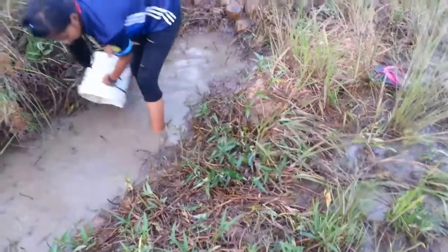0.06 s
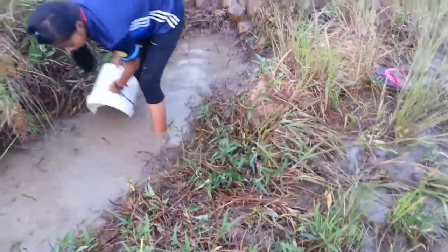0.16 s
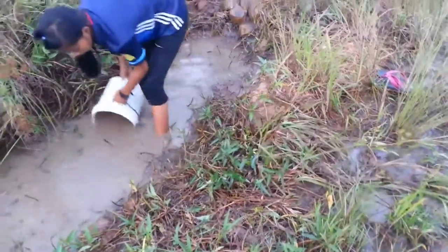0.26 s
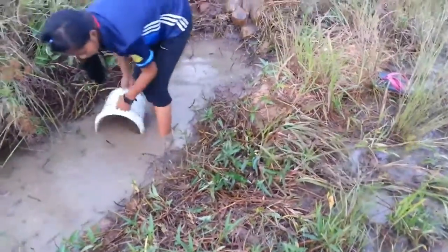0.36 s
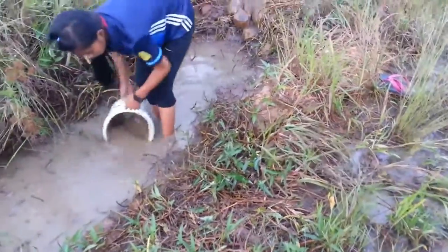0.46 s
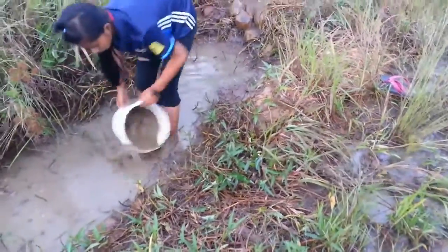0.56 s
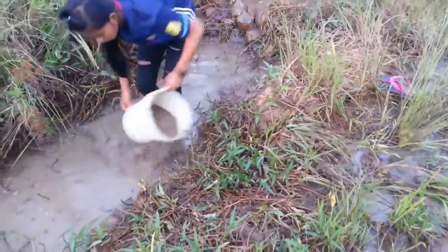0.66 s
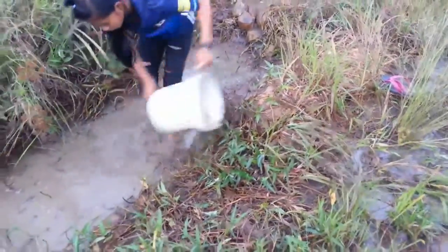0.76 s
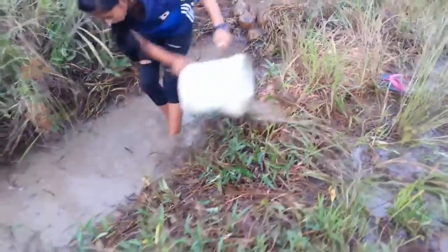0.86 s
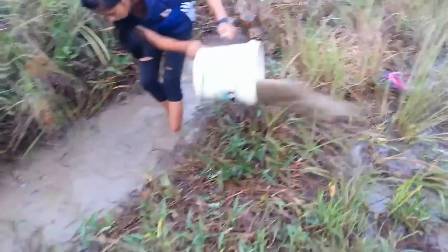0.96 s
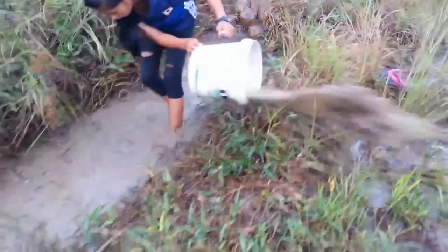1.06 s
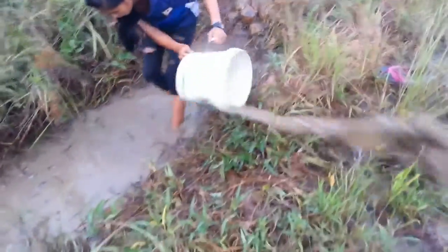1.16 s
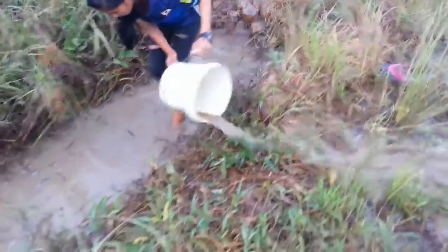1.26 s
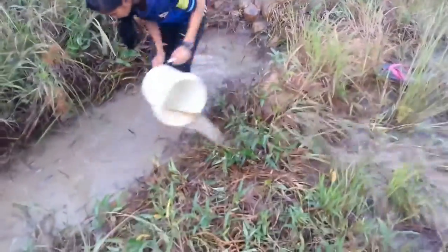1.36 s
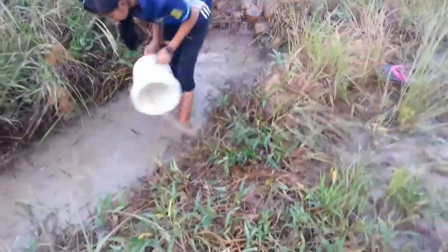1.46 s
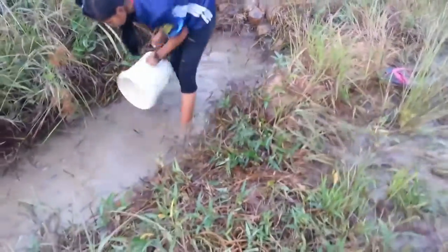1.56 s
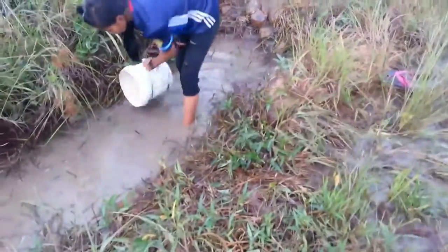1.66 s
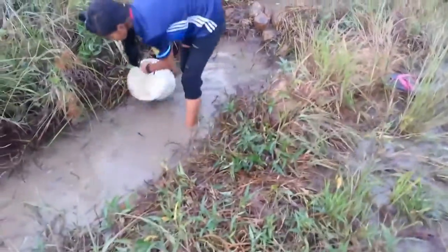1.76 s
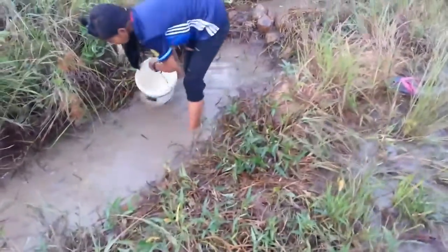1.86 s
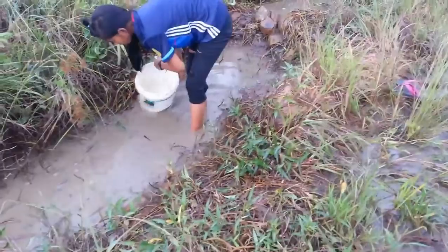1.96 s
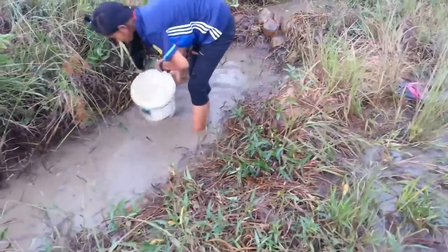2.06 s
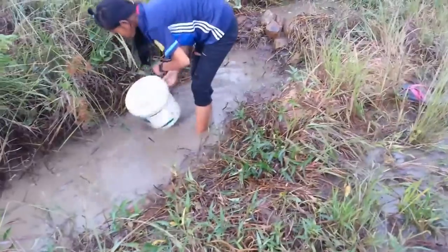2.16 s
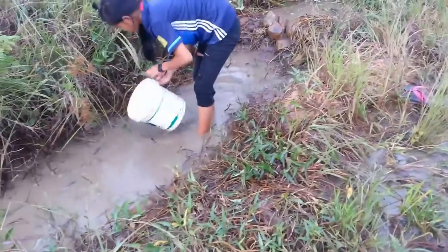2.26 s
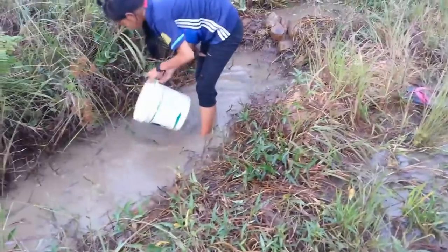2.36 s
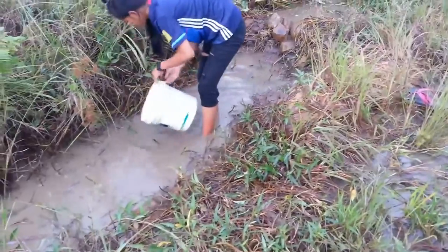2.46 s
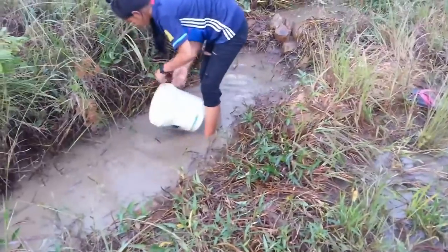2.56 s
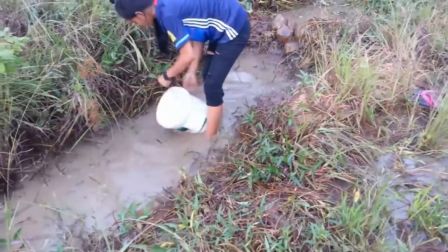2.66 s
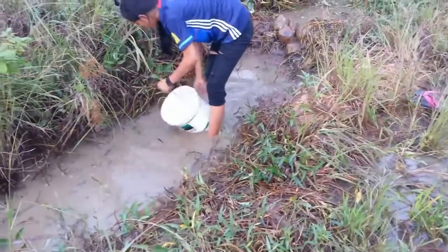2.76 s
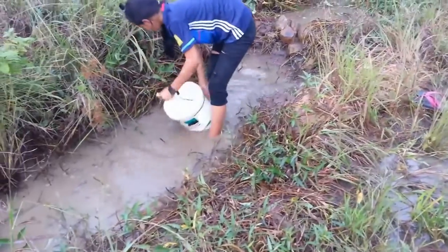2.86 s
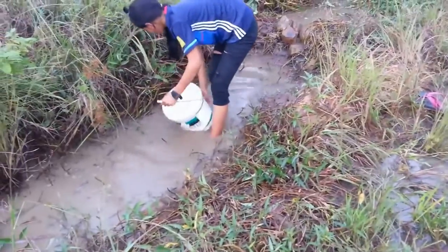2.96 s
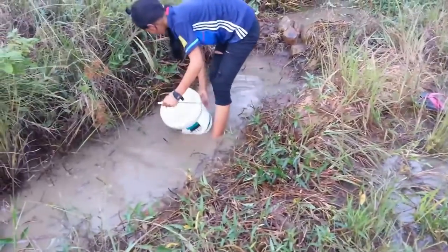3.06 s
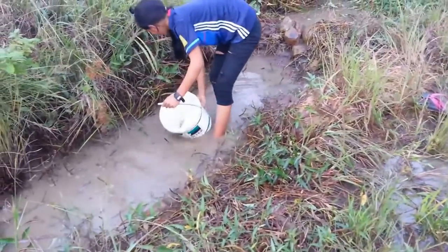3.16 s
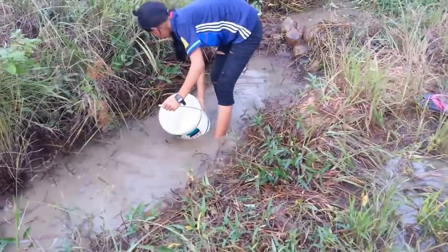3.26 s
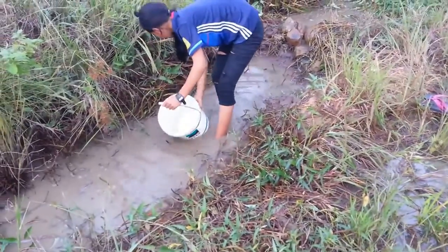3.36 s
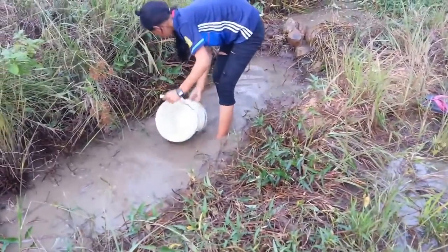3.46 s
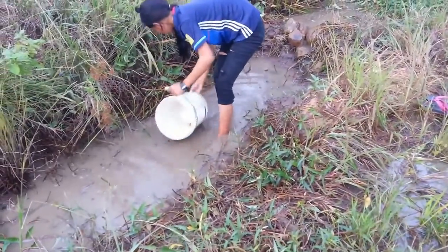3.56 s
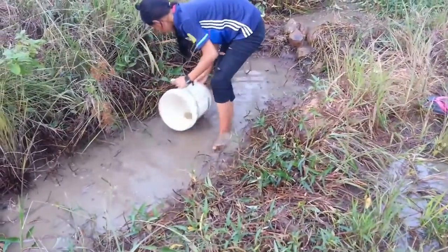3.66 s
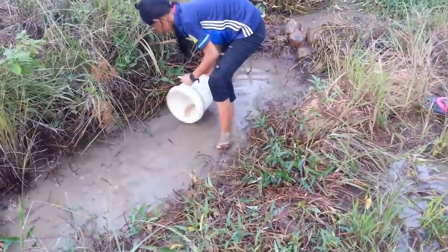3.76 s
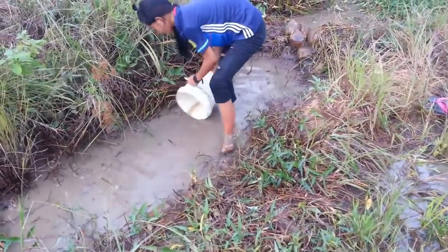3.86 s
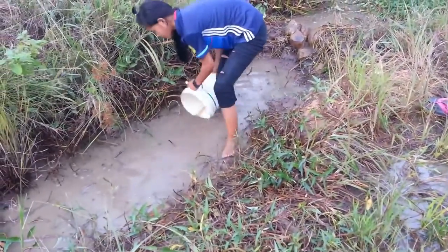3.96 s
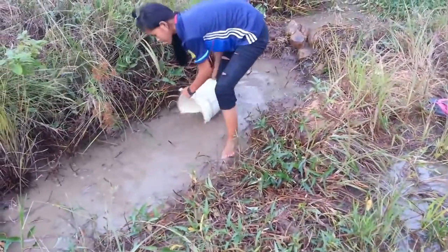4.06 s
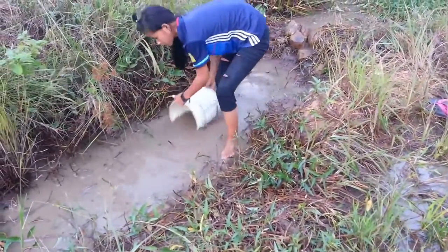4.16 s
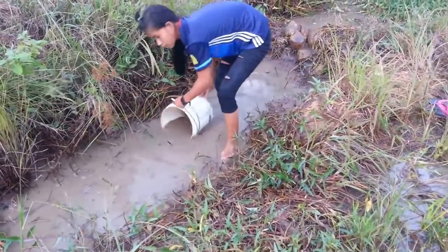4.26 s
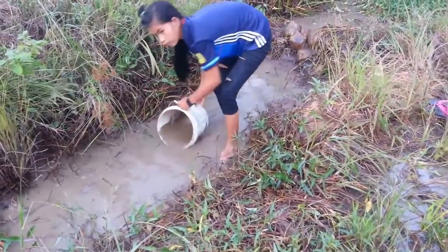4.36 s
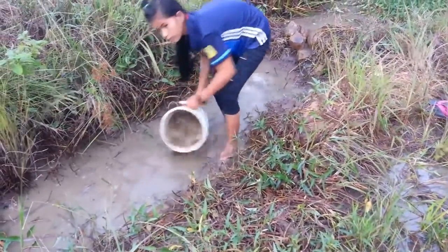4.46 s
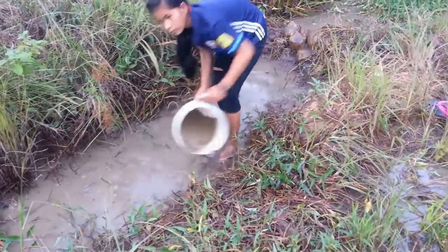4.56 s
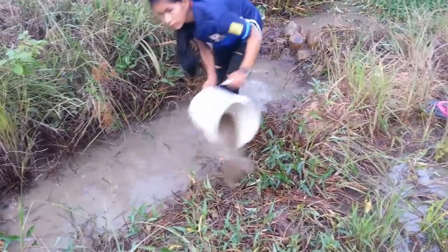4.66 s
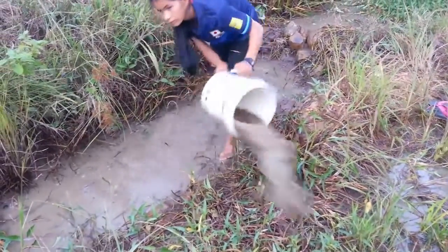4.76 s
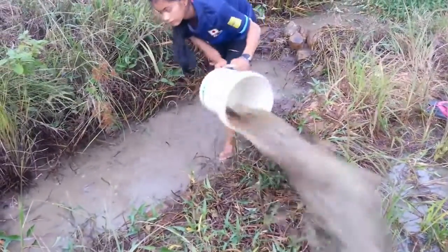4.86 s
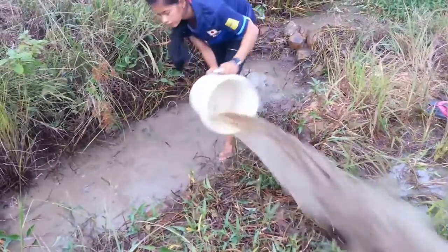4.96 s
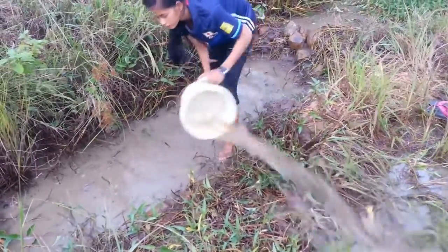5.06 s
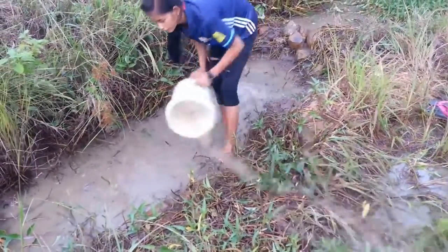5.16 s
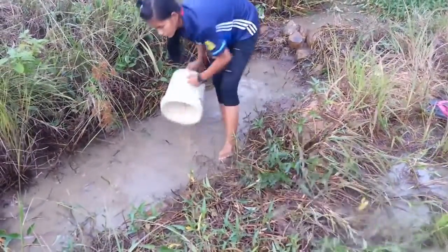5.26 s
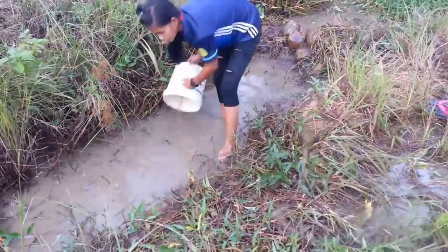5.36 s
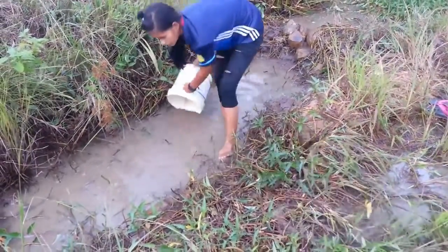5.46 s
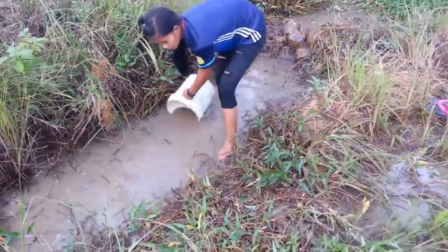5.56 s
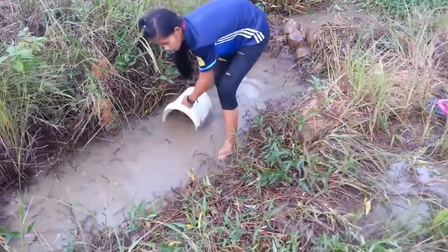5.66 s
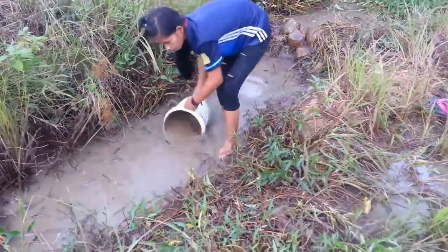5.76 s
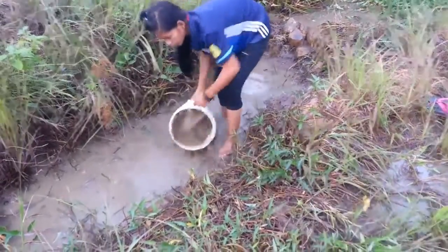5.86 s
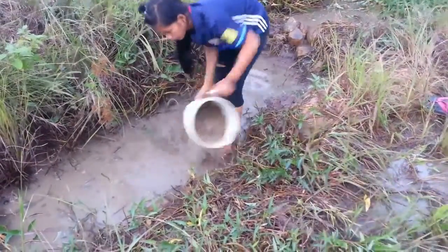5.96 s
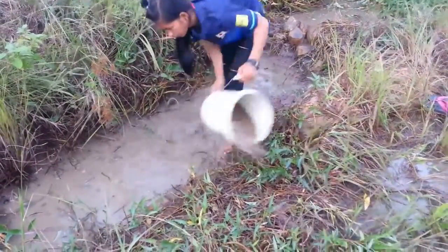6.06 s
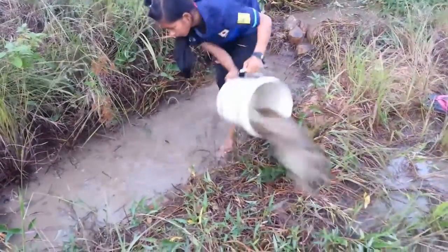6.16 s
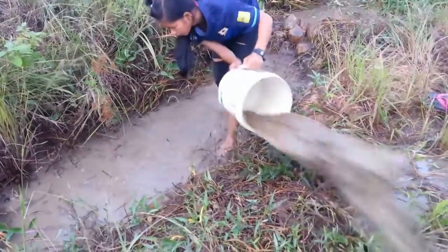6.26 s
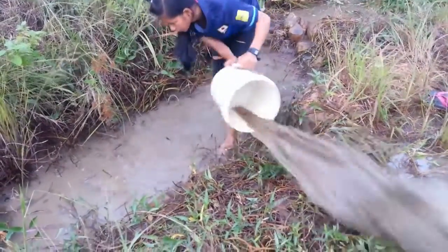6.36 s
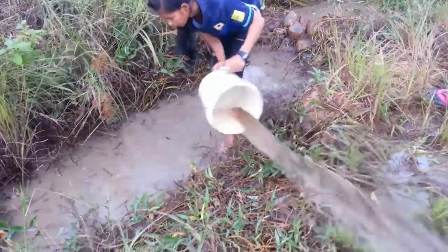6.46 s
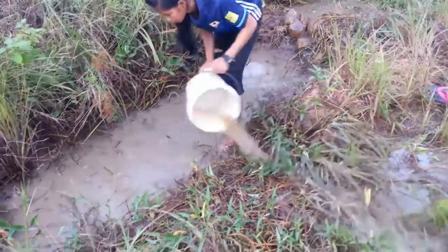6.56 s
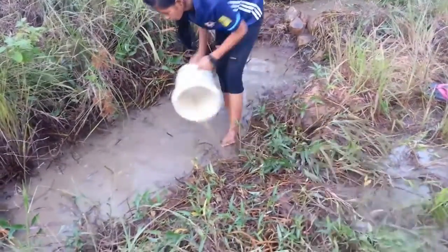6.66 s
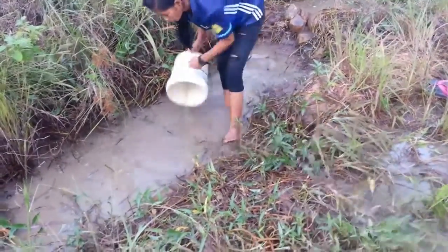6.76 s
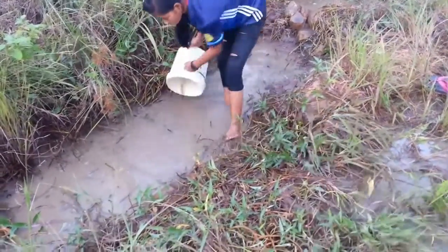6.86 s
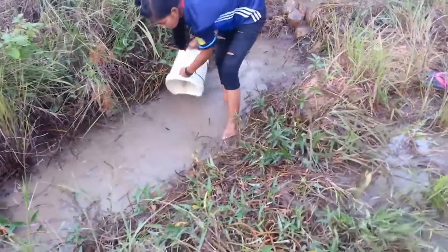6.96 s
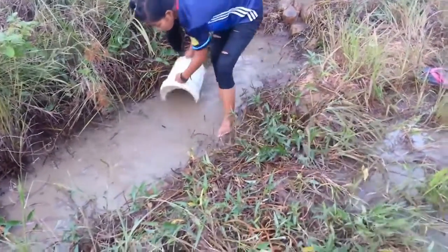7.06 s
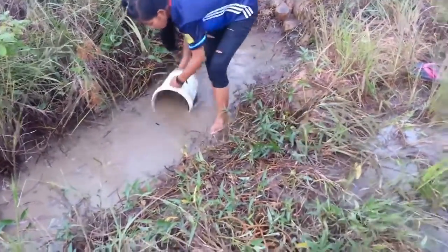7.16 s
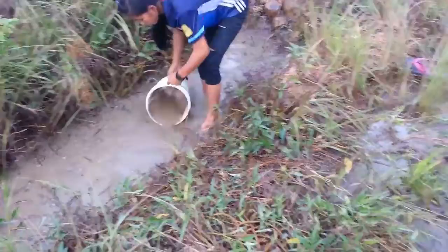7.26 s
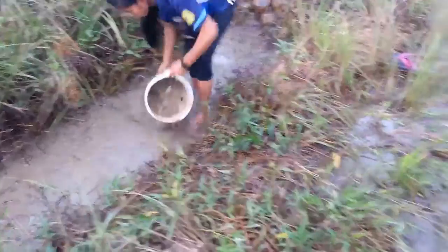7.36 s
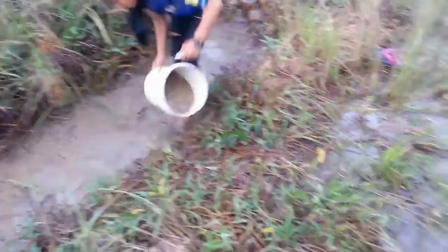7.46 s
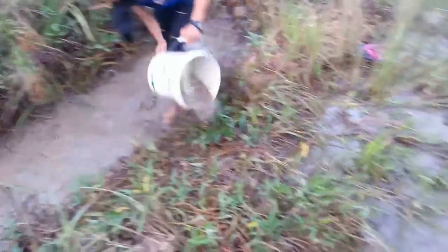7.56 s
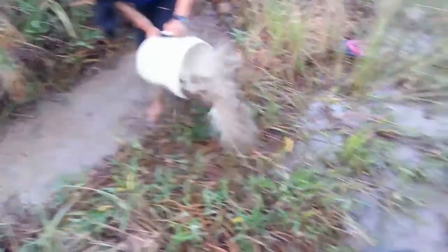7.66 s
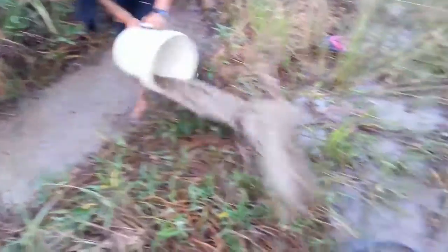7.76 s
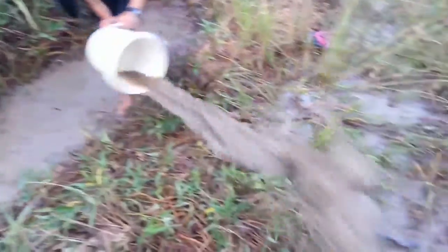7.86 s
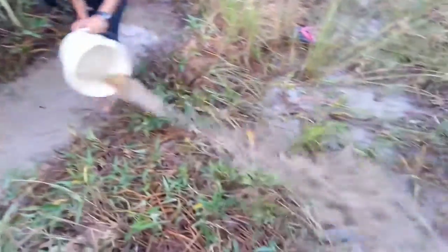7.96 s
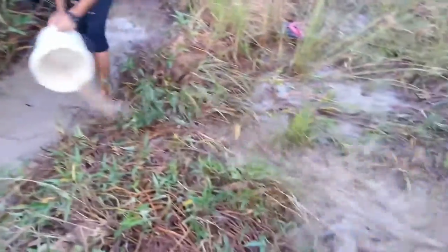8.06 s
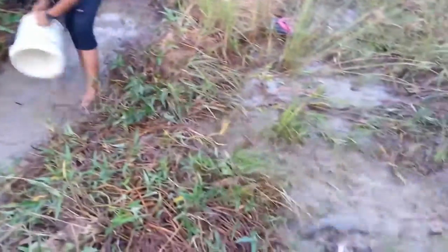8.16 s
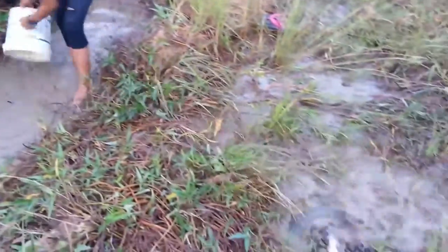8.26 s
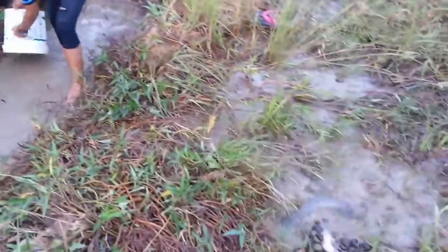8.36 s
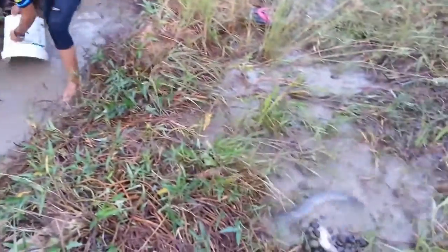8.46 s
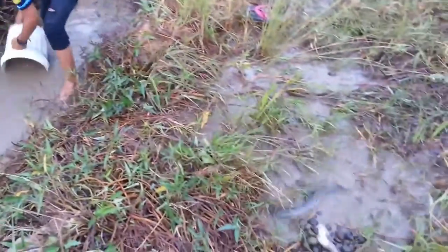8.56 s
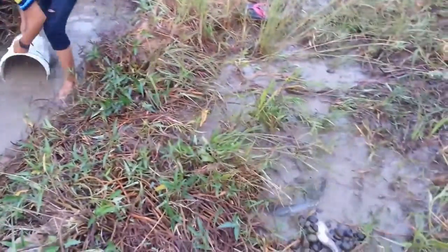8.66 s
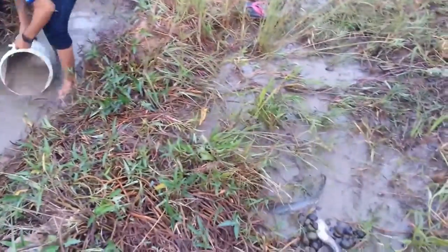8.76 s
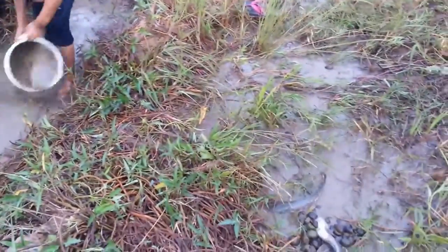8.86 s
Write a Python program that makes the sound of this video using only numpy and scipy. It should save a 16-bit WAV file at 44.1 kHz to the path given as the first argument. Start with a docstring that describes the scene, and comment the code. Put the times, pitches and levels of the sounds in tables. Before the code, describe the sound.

Close outdoor view of a plastic bucket bailing a muddy ditch. It gulps and sloshes, throws a load that splatters on the grassy bank, then booms hollowly when empty. Quieter dabbling and small slaps follow, then three more scoops and splashing throws. A far one-cylinder engine thuds steadily and a small bird repeats a high trill. Stereo, with the left side noticeably brighter.

```python
"""A plastic bucket bails a muddy ditch: it dips, gulps and sloshes, then flings a first load onto a grassy bank.
Straight after that, the emptied bucket booms like a drum; more bailing follows, then three loads in turn.
Throughout, a far one-cylinder engine thuds and a small bird repeats its trill.
Water is summed from droplets, bubbles and filtered noise; the bucket rings as decaying sines.
The left microphone is much stronger than the right in the presence range."""
import sys
import numpy as np
from scipy import signal
from scipy.fft import rfft, irfft, next_fast_len
from scipy.io import wavfile
from scipy.ndimage import map_coordinates

SR = 44100
rng = np.random.default_rng(int(sys.argv[2]) if len(sys.argv) > 2 else 0)


def pcm_store(signal):
    """Save signal as 16-bit PCM."""
    levels = np.round(np.clip(np.atleast_2d(signal), -1, 1) * 32767)
    wavfile.write(sys.argv[1], SR, levels.astype(np.int16).T)


N = 393372


def amp(db):
    """Decibels to gain."""
    return 10 ** (np.asarray(db) / 20)


def unit(x):
    """Scale to rms 1."""
    return x / np.sqrt(np.mean(x ** 2) + 1e-20)


def along(points, hz):
    """Interpolate (f/Hz, value) points on a log frequency axis."""
    point_hz, values = np.transpose(points)
    return np.interp(np.log(hz + 1), np.log(point_hz), values)


def wobble(knots_per_s):
    """Smooth random curve through normally distributed knots."""
    knots = rng.standard_normal(int(N * knots_per_s / SR) + 4)
    return map_coordinates(knots, [np.arange(N) * knots_per_s / SR], order=2)


def coloured(x, spectrum):
    """Minimum-phase filter with the gain of (f/Hz, level/dB) points, by folding the cepstrum."""
    n = x.shape[-1]
    m = 2 * next_fast_len(n // 2 + 2048)
    gain = amp(along(spectrum, np.fft.rfftfreq(m, 1 / SR)))
    cepstrum = irfft(np.log(gain))
    cepstrum[1:m // 2] *= 2
    cepstrum[m // 2 + 1:] = 0
    response = np.exp(rfft(cepstrum))
    return irfft(rfft(x, m) * response, m)[..., :n]


def add(track, start_s, sound):
    """Mix a sound into a track at start_s."""
    part = track[..., max(0, round(start_s * SR)):][..., :sound.shape[-1]]
    part += sound[..., :part.shape[-1]]


def swell(peak_s, rise_s, hold_s, fade_s):
    """Gain straight in dB: up to 1 at peak_s, hold, fade; rise_s and fade_s each span 20 dB."""
    t = np.arange(N) / SR - peak_s
    rise = np.maximum(-t, 0) / rise_s
    fade = np.maximum(t - hold_s, 0) / fade_s
    return amp(-20 * (rise + fade))


def spread(starts, shapes, lead_ms, scatter_ms):
    """Sum grains in stereo; each has its own left-channel lead (negative: right leads), as from its direction."""
    lag = np.round(rng.normal(lead_ms, abs(scatter_ms), len(starts)) * SR / 1000).astype(int)
    places = starts[:, None] + np.arange(shapes.shape[1])
    return np.array([np.bincount(np.abs(places + d).ravel(), shapes.ravel(), N)[:N]
                     for d in (0, lag[:, None])])


def droplets(per_s, size_db, lead_ms, scatter_ms):
    """Tiny impacts: single-sample clicks of very unequal size and random sign."""
    count = int(per_s * N / SR)
    sizes = amp(size_db * np.minimum(rng.exponential(size=count), 4))
    sizes = sizes * rng.choice([-1, 1], count)
    return unit(spread(rng.integers(0, N, count), sizes[:, None], lead_ms, scatter_ms))


def bubble(t, start_hz, t60_s, rise):
    """An air pocket rings, its pitch climbing as it nears the surface."""
    ring = np.sin(2 * np.pi * start_hz * t * (1 + rise * t / t60_s))
    return ring * amp(-60 * t / t60_s) * (1 - np.exp(-2 * start_hz * t))


def froth(per_s, hz, octaves, cycles, size_db, lead_ms):
    """A cloud of bubbles of random size, pitch and life."""
    count, t = int(per_s * N / SR), np.arange(SR // 70) / SR
    octave, linger = rng.standard_normal((count, 2)).T[:, :, None]
    pitch_hz = np.clip(hz * 2 ** (octaves * octave), 400, 12000)
    life_s = np.minimum(cycles / pitch_hz * 2 ** (linger / 2), 2 * t[-1])
    sizes = amp(size_db * np.minimum(rng.exponential(size=(count, 1)), 3))
    rings = sizes * bubble(t, pitch_hz, life_s, rise=0.14)
    return unit(spread(rng.integers(0, N, count), rings, lead_ms, scatter_ms=0.19))


# open-air hiss spectrum: f/Hz, relative level/dB
AIR_SPECTRUM = [(25, -20), (55, 12.5), (150, -1), (300, 2.5), (600, -5.5), (1000, -4.5), (2000, -20),
                (4000, -37), (8000, -15.5), (11000, -18), (15000, -30)]


def open_air():
    """Faint stereo hiss: independent noise per channel, filtered."""
    return amp(-56) * unit(coloured(rng.standard_normal((2, N)), AIR_SPECTRUM))


# engine speed and loudness: t/s, firings per second [1/s], relative level/dB
ENGINE_FIRING = [(0, 18.6, -8.5), (.5, 19.9, 0.5), (1.1, 20.5, -2), (2.2, 20.4, -1), (3.6, 20.8, -3),
                 (5.25, 22, 1.5), (5.6, 19, -0.5), (6.4, 19, 1), (7.7, 17.4, 3), (8.4, 16.3, 0),
                 (8.92, 16, 3.5)]
# exhaust thud spectrum: f/Hz, relative level/dB
EXHAUST_SPECTRUM = [(25, -41), (50, -22), (80, -2.5), (120, 8.5), (150, 7.5), (190, -24.5), (330, -19),
                    (500, -49), (1000, -69)]
# engine clatter spectrum: f/Hz, relative level/dB
CLATTER_SPECTRUM = [(40, -17), (90, 3), (170, -4.5), (340, -4), (450, -18.5), (800, -17.5), (2000, -39)]


def engine():
    """One soft exhaust thud per firing, over low noise clatter that throbs with it."""
    point_s, firings_per_s, level_db = np.transpose(ENGINE_FIRING)
    t = np.arange(N) / SR
    cycles = np.cumsum(np.interp(t, point_s, firings_per_s)) / SR
    firings = np.diff(np.floor(cycles), prepend=0) * amp(2.2 * wobble(12))
    thuds = unit(coloured(firings, EXHAUST_SPECTRUM))
    throb = 1 + 0.61 * np.cos(2 * np.pi * cycles)
    clatter = unit(coloured(rng.standard_normal(N) * throb, CLATTER_SPECTRUM))
    return amp(np.interp(t, point_s, level_db)) * (amp(-50) * thuds + amp(-49) * clatter)


# bird songs: first long note t/s, relative level/dB, trill notes before it [count], growth per trill note [dB]
BIRD_SONGS = [(.852, -38.5, 10, .25), (2.454, -37.5, 11, .65), (3.942, -38.5, 15, 1.1),
              (5.368, -41, 11, .7), (6.858, -41, 11, .7), (8.318, -41, 11, .7)]


def bird():
    """A quick soft trill grows and ends in four longer, louder notes; each note slides down."""
    short_gap_s, lead_gap_s, long_gap_s = 0.042, 0.056, 0.0685
    short_top_hz, long_top_hz, end_hz = 7080, 7550, 6200
    short_db = -6.5  # last trill note re long notes
    out = np.zeros(N)
    ending = [(k * long_gap_s, long_gap_s, long_top_hz, 0) for k in range(4)]
    for song_s, song_db, count, growth_db in BIRD_SONGS:
        trill = [(-lead_gap_s - k * short_gap_s, short_gap_s, short_top_hz, short_db - k * growth_db)
                 for k in range(count)]
        for offset_s, gap_s, top_hz, note_db in trill + ending:
            u = np.linspace(0, 1, int((0.0195 + 0.42 * gap_s) * SR))
            hz = (top_hz + (end_hz - top_hz) * u ** 1.1) * rng.normal(1, 0.004)
            note = np.sin(np.pi * u) ** 2 * np.sin(2 * np.pi * np.cumsum(hz) / SR)
            add(out, song_s + offset_s, amp(song_db + note_db + rng.normal(0, 1)) * note)
    return out


def banks(x):
    """The ditch's banks scatter a short, weak echo: convolution with decaying, filtered noise."""
    t = np.arange(SR // 6) / SR
    tail = rng.standard_normal((2, len(t))) * amp(-60 * t / 0.21) * (t > 0.003)
    tail = coloured(tail / np.linalg.norm(tail[0]), [(250, -39), (1000, 2), (5000, -2.5), (14000, 4)])
    return signal.fftconvolve(x, tail, axes=1)[:, :N]


# blows on the empty bucket: t/s, relative level/dB
BOOM_BLOWS = [(1.581, -12), (1.588, -21)]
# bucket modes: f/Hz, relative level/dB, t60/s
BUCKET_MODES = [(160.2, 0.5, 0.18), (305, 1.5, 0.079), (371, -39, .16), (780, -31, .1), (947, -17, 0.18)]


def boom():
    """The bucket's base flexes and rings the air inside: decaying sine modes."""
    out, t = np.zeros(N), np.arange(SR // 2) / SR
    ring = sum(amp(db - 60 * t / t60_s) * np.sin(2 * np.pi * hz * t) for hz, db, t60_s in BUCKET_MODES)
    onset = 1 - np.exp(-t / 0.003)
    for blow_s, blow_db in BOOM_BLOWS:
        add(out, blow_s, -amp(blow_db) * ring * onset)
    return out


# ringing air pockets, plinks to gulps under the rim: t/s, relative level/dB, starting f/Hz
AIR_POCKETS = [(.358, -23.5, 656), (.389, -27.5, 623), (.4, -28, 2070), (.465, -31.5, 316),
               (.562, -31, 314), (.695, -35, 1900), (.723, -30, 1190), (.76, -25.5, 356), (.835, -28, 1970),
               (0.853, -32, 360), (1.902, -27.5, 322), (2.059, -34, 1720), (2.231, -40, 1030),
               (2.662, -29.5, 600), (2.681, -28.5, 302), (3.236, -38, 1056), (3.297, -32.5, 292),
               (3.362, -39, 304), (3.479, -40, 320), (3.503, -35.5, 336), (3.819, -33.5, 2630),
               (4.122, -30, 2960), (4.295, -32.5, 2897), (4.386, -32, 2760), (4.496, -35, 725),
               (4.651, -23, 344), (4.701, -22.5, 1960), (4.753, -24, 256), (4.854, -28.5, 880),
               (4.919, -31, 1040), (5.904, -16, 337), (5.977, -37, 1250), (6.018, -28, 2700),
               (6.09, -30, 382), (6.302, -30.5, 2580), (6.343, -31, 2034), (7.246, -34, 264),
               (7.372, -27.5, 998), (7.554, -27.5, 384), (7.684, -28, 2500), (7.752, -35, 820),
               (8.01, -22, 169), (8.693, -19, 305), (8.721, -22, 218.7), (8.737, -25.5, 246),
               (8.811, -31.5, 345)]


def air_pockets():
    """Small bubbles plink; large ones gulp, and ring longer, as the bucket fills."""
    out, t = np.zeros(N), np.arange(SR // 4) / SR
    for start_s, db, hz in AIR_POCKETS:
        t60_s = 0.046 * (1000 / hz) ** 0.37  # falls as a power of pitch
        add(out, start_s, amp(db) * bubble(t, hz, t60_s, rise=0.078))
    return out


# wet slaps of bucket and water: t/s, relative level/dB, cavity f/Hz, spray re cavity [dB], main t60/s
WET_SLAPS = [(0.419, -30, 1670, -20, 0.068), (0.4428, -34, 4020, -8, .056), (0.596, -39.5, 2440, 4, 0.042),
             (0.809, -28, 2100, -17, .042), (0.89, -28, 2800, -8, 0.04), (1.589, -26, 1290, -2, 0.1),
             (1.6107, -21, 2230, -8, 0.046), (1.661, -33.5, 2750, -2, .042), (1.7705, -40, 3340, 2, 0.037),
             (1.8453, -36.5, 1640, -2.5, 0.11), (1.876, -26.5, 1690, -14, 0.084),
             (2.079, -37, 1700, -5, 0.036), (2.119, -35, 1730, -9, 0.038), (2.211, -40.5, 1750, -4, 0.041),
             (2.356, -35.5, 1150, -21, .06), (2.406, -40, 1280, -13, 0.13), (2.573, -43, 1800, -3, .07),
             (2.657, -33.5, 1400, -5.5, 0.12), (2.679, -20, 1730, -30, .042), (2.698, -32, 1330, -11, .07),
             (2.937, -42, 3370, -7, 0.034), (2.97, -38.5, 1500, -18, 0.05), (3.072, -47, 1760, -7, .12),
             (3.194, -45.5, 1400, -1, .09), (3.207, -39, 1600, -22, 0.039),
             (3.4377, -40.5, 1560, -2.5, 0.068), (3.668, -51.5, 1500, 0, .06), (3.762, -40.5, 2130, 0, .1),
             (3.8957, -33, 2660, -17, 0.026), (3.943, -32, 2800, -17, .04),
             (3.955, -29.5, 2330, -5.5, 0.047), (3.988, -26.5, 1720, -8, .08), (4.016, -25, 3030, 0.5, .05),
             (4.149, -34, 1200, 5.5, 0.05), (4.239, -38, 3570, -9, 0.14), (4.435, -30, 1390, -26, 0.032),
             (4.6152, -25.5, 2440, -19, .05), (4.6435, -25, 2070, -19, 0.11),
             (4.809, -34.5, 1520, -2.5, 0.15), (4.8845, -38.5, 1163, -6, .09),
             (5.139, -12.5, 3160, -15, .035), (5.15, -20, 4700, -15, .035), (5.212, -18, 4100, -15, .11),
             (5.341, -31, 2880, -7, 0.039), (5.758, -34, 3600, 1, 0.062), (5.772, -32.5, 2370, 3, 0.055),
             (5.864, -27, 2580, -14, 0.037), (5.8927, -25, 1780, -5.5, 0.095), (6.062, -24, 2050, -2, .11),
             (6.086, -18.5, 3180, -14, 0.061), (6.772, -24.5, 3330, -12, 0.11),
             (7.119, -36, 2140, -1, 0.083), (7.224, -33.5, 2730, 1, 0.13), (7.247, -19.5, 1460, -14, 0.039),
             (7.2974, -41, 2020, 12.5, 0.046), (7.3575, -30.5, 2150, -9, 0.06),
             (7.511, -20.5, 1850, -27, .07), (7.5916, -25, 3170, -19.5, 0.041),
             (7.7516, -36, 1200, -3, 0.059), (8.122, -27, 3000, -16, .04), (8.144, -19.5, 2975, -1, 0.16),
             (8.695, -33.5, 940, -3, 0.062), (8.71, -30.5, 2210, 3.5, 0.031), (8.761, -35, 2360, 0.5, .045),
             (8.782, -36.5, 3290, -3, 0.037)]
# cavity noise spectrum: multiple of cavity pitch [1], relative level/dB
CAVITY_SPECTRUM = [(.25, -27), (.6, -8), (1, -2), (1.6, -5.5), (3.001, -22.5), (8, -48)]
# spectrum of fine spray, also the sloshing mist: f/Hz, relative level/dB
FIZZ_SPECTRUM = [(1500, -5), (3000, 4.5), (4800, 5.5), (6500, 4), (8500, 1.5), (11000, 2), (14500, -5)]


def slaps():
    """Each slap is a ragged collapsing cavity and a spill of small bubbles, with a dull body and bright spray."""
    out, t = np.zeros((2, N)), np.arange(SR // 9) / SR
    cavity_spectrum = np.array(CAVITY_SPECTRUM)
    for start_s, db, cavity_hz, spray_db, t60_s in WET_SLAPS:
        # larger, lower cavities have more body: -16 dB/octave
        body_db = -7.5 - 16 * np.log2(cavity_hz / 1470)
        rise_s = 0.02113 * t60_s  # a longer slap opens more softly
        dying = amp(-60 * t / t60_s) + amp(-27 - 60 * t / 0.22)
        shape = dying * (1 - np.exp(-(t / rise_s) ** 2))
        ragged = amp(2.5 * np.interp(t, t[::60], rng.standard_normal(len(t[::60]))))
        ragged /= np.sqrt(np.average(ragged ** 2, weights=shape ** 2))  # clumps share out the energy
        core, body = rng.standard_normal((2, len(t))) * ragged
        apart, mist = rng.standard_normal((2, 2, len(t))) * ragged
        cavity = unit(coloured(core + 0.5 * apart, cavity_spectrum * [cavity_hz, 1]))
        thud = unit(coloured(body, [(120, -18.5), (350, -11), (700, -6.5), (1300, -11), (5000, -56)]))
        spray = unit(coloured(mist, FIZZ_SPECTRUM))
        slap = cavity + amp(body_db) * thud + amp(spray_db) * spray
        add(out, start_s, amp(db - 2) * shape / shape.max() * slap)
        for wait, octave, size_db in rng.standard_normal(size=(4, 3)):
            hz = cavity_hz * 2 ** (0.382 * octave)
            spill_s = start_s + rise_s + 0.11 * t60_s * abs(wait)
            add(out, spill_s, amp(db - 2.5 + size_db) * bubble(t, hz, 24 / hz, rise=0.14))
    return out


# surges of water around bucket and legs: peak t/s, relative level/dB, 20 dB build-up [s], 20 dB fade [s]
SURGES = [(.41, -43.5, 0.15, 0.65), (.775, -34, 0.32, 0.29), (2.169, -49, 0.16, 0.25),
          (2.39, -48, 0.071, 0.1), (3.49, -50.5, 0.11, 0.37), (3.8, -48.5, 0.087, 0.11),
          (3.98, -38.5, 0.096, 0.1), (4.42, -50, 0.95, .3), (4.645, -32, 0.35, 0.25),
          (5.87, -40, 0.25, 0.39), (6.07, -31.5, 0.21, 0.28), (7.3, -38, 0.11, 0.46),
          (7.53, -33, 0.24, 0.24), (8.74, -44.5, 0.26, 0.24), (8.92, -42, 0.18, .3)]
# faint continuous trickle: t/s, relative level/dB
TRICKLE_LEVEL = [(0, -56), (1.1, -55.5), (1.85, -53.5), (2.35, -65.5), (2.85, -63), (3.4, -74),
                 (3.7, -64.5), (4.3, -54.5), (5.6, -52), (8.92, -53)]
# churned water spectrum: f/Hz, relative level/dB
CHURN_SPECTRUM = [(120, -23), (330, 8.5), (520, -5.5), (900, 1), (1500, -2.5), (2600, 1), (4800, -13),
                  (6500, -29), (14000, -43)]


def sloshing():
    """Stirred water folds over into a mass of bubbles, some ringing clear; hard stirring adds spatter and fizz."""
    surge = np.sqrt(sum((amp(db) * swell(peak_s, rise_s, 0, fade_s)) ** 2
                        for peak_s, db, rise_s, fade_s in SURGES))
    trickle = amp(np.interp(np.arange(N) / SR, *np.transpose(TRICKLE_LEVEL)))
    churn = np.hypot(surge, amp(-3) * trickle)
    surge_fizz = amp(-35.5) * (surge / amp(-32.5)) ** 1.93  # grows faster than the churn
    fizz = np.hypot(surge_fizz, trickle)
    folds = wobble(45)
    wash = droplets(per_s=1500, size_db=1.5, lead_ms=-0.016, scatter_ms=0.052)
    wash = unit(coloured(wash, CHURN_SPECTRUM))
    bubbles = froth(per_s=380, hz=1800, octaves=0.64, cycles=22, size_db=3.7, lead_ms=-0.03)
    spatter = froth(per_s=240, hz=3000, octaves=0.42, cycles=34, size_db=4.5, lead_ms=-0.08)
    plops = froth(per_s=90, hz=1050, octaves=0.55, cycles=26, size_db=4, lead_ms=0)
    mist = droplets(per_s=6000, size_db=2.5, lead_ms=-0.13, scatter_ms=0.072)
    mist = unit(coloured(mist, FIZZ_SPECTRUM) * amp(2 * folds))
    water = unit((bubbles + 0.4 * plops + 0.72 * wash) * amp(2.5 * folds))
    spatter_gain = amp(-2.3) * np.sqrt(churn * fizz)
    return churn * water + spatter_gain * spatter + amp(4.5) * fizz * mist


# loads landing on the bank: t/s, lead of first drops [s], first drops re spray [dB], 20 dB build-up [s],
# pour [s], spray relative level/dB, delay of main lump after landing [s], lump relative level/dB,
# lump 20 dB build-up [s], lump 20 dB fade [s]
LANDINGS = [(1.31, 0.069, -23.5, 0.019, 0.078, -17, 0.041, -16, 0.045, 0.096),
            (5.207, 0.201, -14, 0.2, 0.011, -17, 0.0046, -27.5, 0.2, 0.11),
            (6.552, 0.057, -13, 0.051, 0.11, -17.5, 0.025, -23.5, 0.036, 0.2),
            (8.006, 0.134, -16.5, 0.092, 0.1, -17.5, 0.009, -15.5, 0.037, 0.084)]
# heavy lump spectrum: f/Hz, relative level/dB
LUMP_SPECTRUM = [(60, -22), (140, -6), (400, -3), (800, 3), (1400, 2.5), (2500, -3.5), (6000, -57)]
# shattering spray spectrum: f/Hz, relative level/dB
SPRAY_SPECTRUM = [(300, -33), (1000, -17), (1600, -7.5), (2300, 1.5), (3500, 0), (4900, 4.5), (6300, -7.5),
                  (8000, -8.5), (11000, -7), (14500, -16)]


def throws():
    """Sheets of water hit the mud in lumps and shatter; stray drops go on pattering through the grass."""
    pour_fade_s, runoff_fade_s = 0.09, 0.28
    heavy, spray = np.zeros((2, N))
    for (land_s, lead_s, first_db, rise_s, pour_s, spray_db,
         lump_delay_s, lump_db, lump_rise_s, lump_fade_s) in LANDINGS:
        # drops ahead of the sheet arrive at once
        first_drops = amp(first_db) * swell(land_s - lead_s, 0.008, lead_s, pour_fade_s)
        pour = swell(land_s, rise_s, pour_s, pour_fade_s)
        # water draining through the grass
        runoff = amp(-6.5) * swell(land_s, rise_s, pour_s, runoff_fade_s)
        sheet = amp(spray_db) * np.max([first_drops, pour, runoff], axis=0)
        lump = amp(lump_db) * swell(land_s + lump_delay_s, lump_rise_s, 0, lump_fade_s)
        spray += sheet
        heavy += np.maximum(lump, amp(-15) * sheet)
    lumps = wobble(70)
    mud = droplets(per_s=2500, size_db=1.5, lead_ms=0.28, scatter_ms=0.075)
    mud = coloured(mud, LUMP_SPECTRUM)
    drops = droplets(per_s=5000, size_db=1.5, lead_ms=0.4, scatter_ms=0.07)
    drops = drops + 0.48 * rng.standard_normal((2, N))
    foam = froth(per_s=240, hz=2900, octaves=0.5, cycles=14, size_db=3.5, lead_ms=0.35)
    shatter = unit(coloured(drops, SPRAY_SPECTRUM)) + amp(-10) * foam
    strays = droplets(per_s=320, size_db=2.8, lead_ms=0.35, scatter_ms=0.15)
    strays = unit(coloured(strays, SPRAY_SPECTRUM))
    lingering = amp(-25) * np.sqrt(spray)  # fades half as fast in dB
    impact = heavy * unit(mud * amp(1.74 * lumps))
    return impact + spray * unit(shatter * amp(0.62 * lumps)) + lingering * strays


def scene():
    """Water and bucket close by, engine and bird far off, in faint open-air hiss."""
    near = throws() + sloshing() + slaps() + air_pockets() + boom()
    song = amp(-2) * np.tile(bird(), (2, 1))
    echo = amp(-11) * banks(near + amp(7) * song)
    return near + song + echo + engine() + open_air()


# microphone colour: f/Hz, left minus right [dB]
LEFT_MINUS_RIGHT = [(60, 0), (200, 1.5), (500, 2), (1200, 5), (1800, 11.5), (2500, 16), (4300, 14.5),
                    (5300, 11.5), (6400, 6), (9500, -2.5), (15000, -3)]


def record(dry):
    """The two microphones differ in colour; deep bass is thinned and nothing passes above the band limit."""
    low_hz, top_hz = 42, 14750
    m = next_fast_len(N + SR // 4)
    hz = np.fft.rfftfreq(m, 1 / SR)
    ratio = amp(along(LEFT_MINUS_RIGHT, hz))
    gains = np.array([ratio, np.ones_like(hz)]) * 2 / (1 + ratio)  # left and right average 1
    thinned = signal.sosfilt(signal.butter(2, low_hz, "high", fs=SR, output="sos"), dry)
    return irfft(rfft(thinned, m) * gains * (hz < top_hz), m)[:, :N]


dry = scene()
out = record(dry)
pcm_store(out)
```